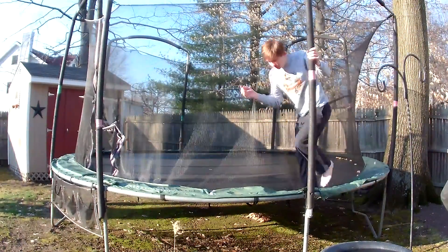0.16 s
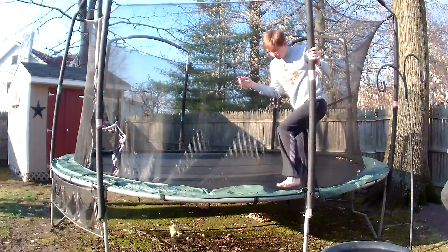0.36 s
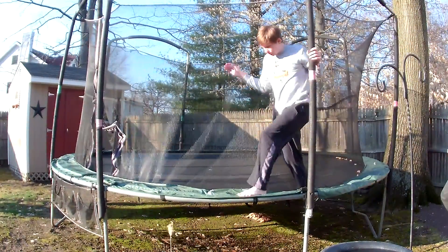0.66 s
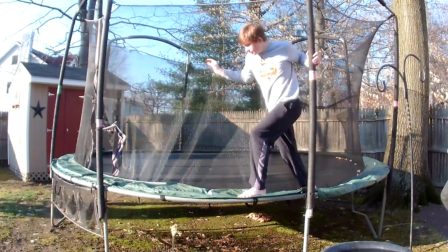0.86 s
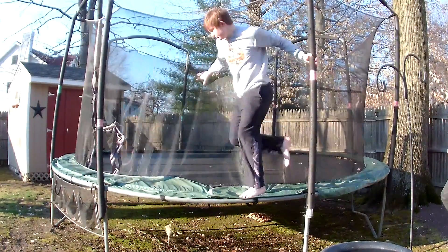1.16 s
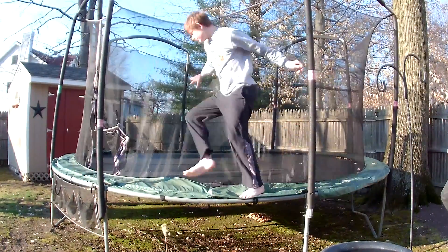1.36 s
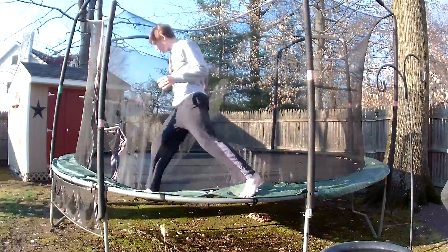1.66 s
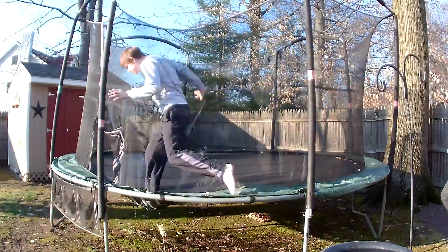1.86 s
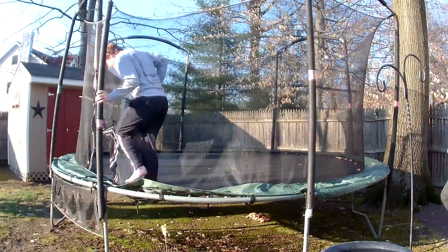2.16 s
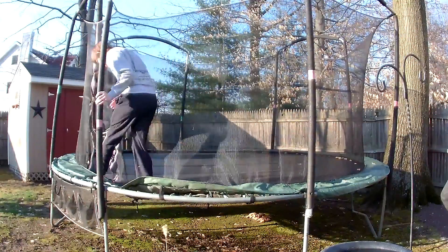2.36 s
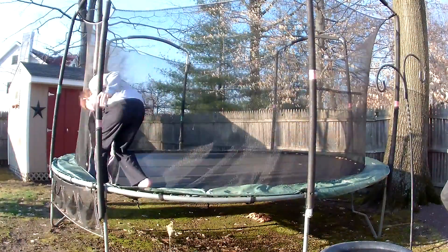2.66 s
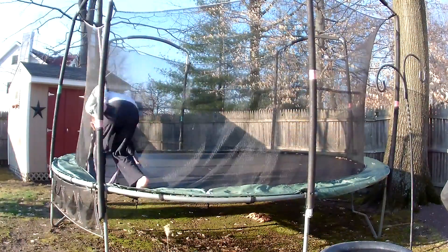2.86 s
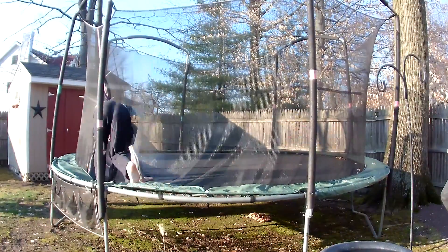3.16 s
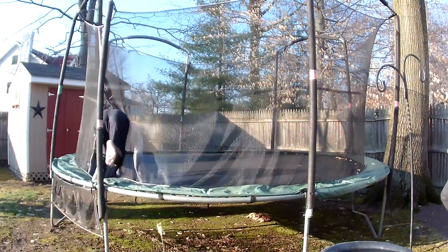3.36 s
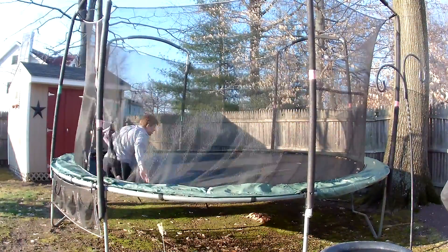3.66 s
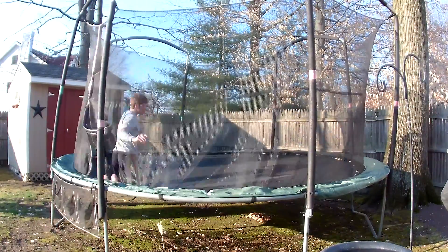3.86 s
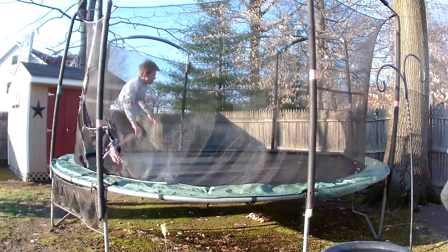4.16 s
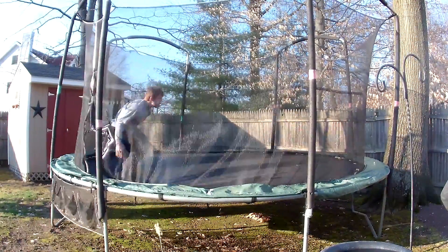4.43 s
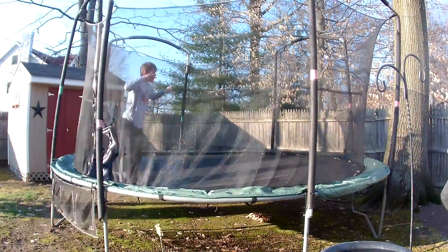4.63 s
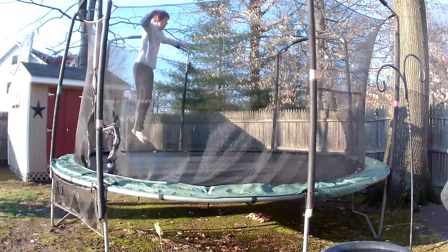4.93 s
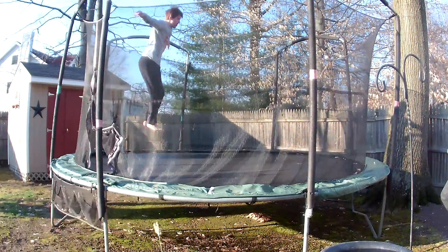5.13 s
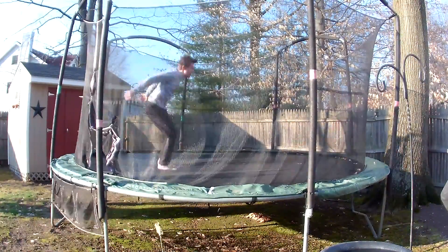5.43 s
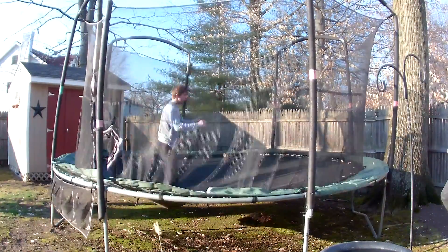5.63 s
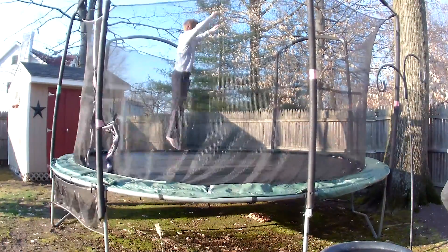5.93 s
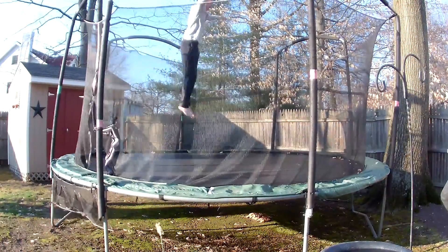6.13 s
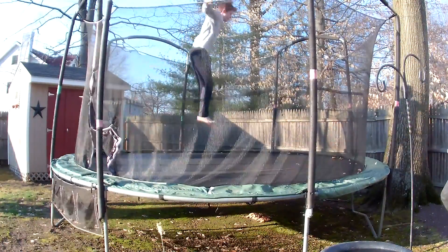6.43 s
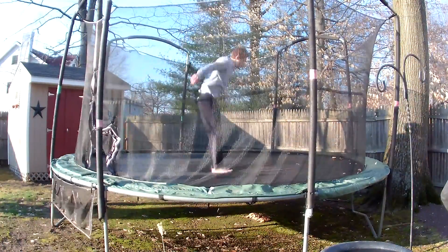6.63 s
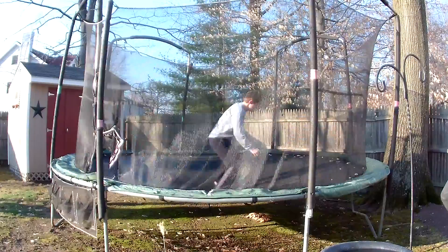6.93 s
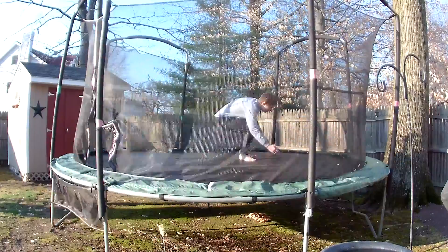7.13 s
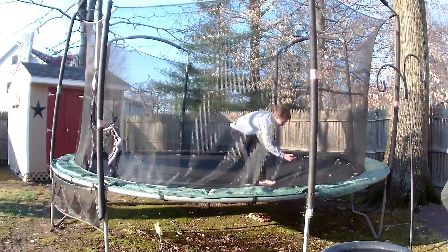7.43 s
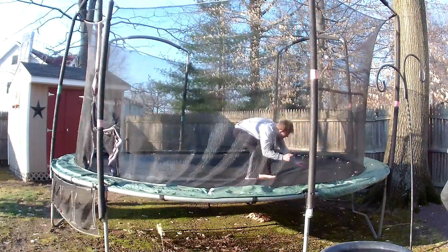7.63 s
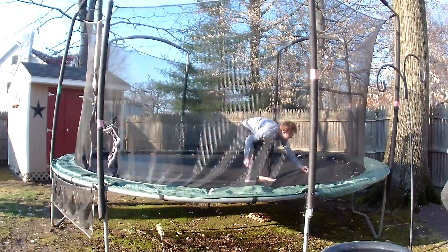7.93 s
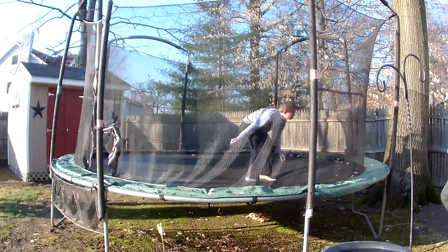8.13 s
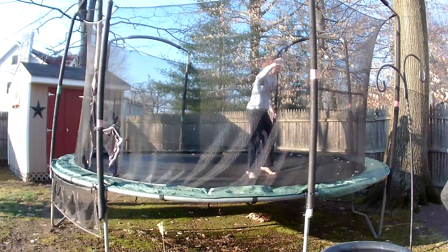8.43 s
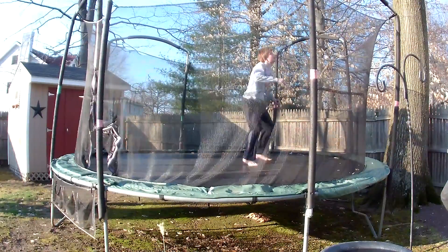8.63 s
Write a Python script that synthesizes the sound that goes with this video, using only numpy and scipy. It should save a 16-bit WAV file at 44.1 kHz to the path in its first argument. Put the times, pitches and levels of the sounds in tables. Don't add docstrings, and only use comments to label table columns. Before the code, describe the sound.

Trampoline fabric rubs and metal hooks clank as a person shuffles, hops and bounces heavily, then settles in a quiet yard with distant traffic.

```python
import sys
import numpy as np
from scipy import signal
from scipy.fft import rfft, irfft, dct, next_fast_len
from scipy.io import wavfile
from scipy.ndimage import uniform_filter1d

SR = 44100
rng = np.random.default_rng(int(sys.argv[2]) if len(sys.argv) > 2 else 0)


def digitize_waveform(pressure):
    field = np.atleast_2d(pressure).T
    bounded = np.clip(field, -1, 1)
    quanta = np.round(bounded * 32767).astype(np.int16)
    wavfile.write(sys.argv[1], SR, quanta)


def boost_factor(decibels):
    exponent = np.asarray(decibels, float) / 20
    return 10 ** exponent


N = 387638

# (frequency [Hz], level [dB per Hz])
RUB_COLOUR = [(180, -64), (300, -37.5), (492, -28.5), (873, -19.5), (1250, -11), (1430, -4), (1840, 0),
              (2380, -2), (4390, -7), (5510, -8.5), (6300, -7), (7300, -11), (9490, -41), (16100, -120)]
# (time [s], blow [dB], brightness [dB], fizz [dB])
STEP_CLANKS = [(0.195, -33, 2.5, 11), (0.6084, -44, -1, -12.5), (0.6395, -37, 0, -5.5),
               (1.1769, -30.5, -1, -8), (1.343, -33, -2.5, 2.5), (1.3551, -32, 0.5, 5.5),
               (1.5192, -34.5, 3, 7.5), (1.6532, -35.5, -3.5, -3), (1.668, -38, 3.5, 16.5),
               (1.7517, -31, 6, 14.5), (1.7907, -31, 4.5, 15), (1.902, -17.5, 0.5, -0.5),
               (1.9121, -17, -6.5, 3.5), (2.025, -26, 1, -10), (2.0401, -26.5, -11, -2),
               (2.0663, -24, -3, -23.5), (2.1125, -27, 9.5, 8), (2.173, -29.5, 5, 5), (2.646, -39.5, 1, 1),
               (2.6617, -25, 2, 2.5), (2.698, -30.5, 9, -6), (3.141, -21.5, -3, -8),
               (3.324, -35.5, 0, -3.5), (3.3689, -27.5, 6, 7), (3.379, -28, 5, 12)]
# (time [s], blow [dB], brightness [dB], fizz [dB])
JUMP_CLANKS = [(3.8518, -35.5, 3, 1.5), (3.8842, -24.5, -3, 0.5), (4.227, -35.5, 11, -2.5),
               (4.285, -31.5, 2, -9.5), (4.355, -28.5, 3, 1), (4.4246, -27, 2, 7), (4.468, -27.5, 2.5, 6),
               (4.6153, -29, 1.5, -8.5), (5.0996, -34, -7, -5), (5.085, -37, 6.5, 2.5),
               (5.108, -33, 7.5, 7.5), (5.172, -31.5, 5, 9), (6.1666, -31.5, 3.5, 11), (6.217, -40, 2, 3.5),
               (6.4073, -36.5, 2.5, 2.5), (6.6672, -31.5, -1.5, -2.5), (7.0754, -17, 0, -7),
               (7.4839, -24.5, -1, -5.5), (8.1586, -39.5, -4, -8.5), (8.543, -36.5, -5, -5.5),
               (8.706, -28.5, 4.5, 6)]


def evened(x):
    return x / np.sqrt(np.mean(x ** 2) + 1e-20)


def wander(n, width):
    return evened(uniform_filter1d(rng.standard_normal(n), width))


def smooth_wander(n, width):
    once = uniform_filter1d(rng.standard_normal(n), width)
    return evened(uniform_filter1d(once, width))


def read(points, hz):
    f, value = np.transpose(points)
    return np.interp(np.log(hz + 1), np.log(f + 1), value)


def add(mix, s, sound):
    part = mix[round(s * SR):][:len(sound)]
    part += sound[:len(part)]


def filtered(x, gain):
    size = next_fast_len(len(x))
    hz = np.fft.rfftfreq(size, 1 / SR)
    return irfft(rfft(x, size) * gain(hz), size)[:len(x)]


def coloured(x, points):
    return filtered(x, lambda hz: boost_factor(read(points, hz)))


def thirds(x):
    layers = []
    for lo, hi in ((0, 2800), (2800, 7900), (7900, SR)):
        layers.append(evened(filtered(x, lambda hz: (hz >= lo) & (hz < hi))))
    return layers


def yard():
    # (frequency [Hz], level [dB per Hz])
    yard_colour = [(9.4, -28), (16, -1.5), (122, -5.5), (164, -12), (296, -16), (643, -19.5), (1290, -11.5),
                   (2140, -12.5), (2450, -21), (3290, -22), (3570, -24), (7150, -21), (7960, -23.5),
                   (9600, -22.5), (12500, -48), (21100, -120)]
    hz, _, z = signal.stft(rng.standard_normal(N), SR, nperseg=4096)
    patches = uniform_filter1d(rng.standard_normal(z.shape), 40, 0)
    patches = evened(uniform_filter1d(patches, 3, 1))
    hz = hz[:, None]
    level_db = read(yard_colour, hz) + 5.3 * (hz < 42) + 0.94 * patches
    x = signal.istft(z * boost_factor(level_db), SR, nperseg=4096)[1][:N]
    return boost_factor(-50.5) * evened(x)


def thump(db, hz, t60, thud_db):
    t = np.arange(SR) / SR
    sway = hz * (1 + .12 * smooth_wander(SR, 1500))
    mode = boost_factor(db - 60 * t / t60) * np.sin(2 * np.pi * np.cumsum(sway) / SR)
    mode *= (1 - np.exp(-t / 0.029)) * 2
    beat = 1 + .45 * np.cos(2 * np.pi * 9 * (t - .04))
    band = signal.butter(2, [130 / SR * 2, 800 / SR * 2], "band")
    thud = evened(signal.lfilter(*band, rng.standard_normal(SR)))
    return mode * beat + boost_factor(thud_db - 60 * t / 0.39) * thud * (1 - np.exp(-t / 0.014))


def add_thumps(mix):
    # (time [s], level [dB], pitch [Hz], time to die by 60 dB [s], thud [dB])
    landings = [(1.9, -64, 110.4, 0.249, -56), (2.128, -48.5, 112.4, 0.41, -68),
                (3.369, -57, 103.6, 0.2418, -72.5), (4.718, -59.5, 110.4, 1.277, -74),
                (5.82, -42.5, 80.29, 0.5144, -61), (5.88, -58.5, 77, 0.233, -48.5),
                (7.041, -41.5, 82.3, 0.7253, -45), (7.15, -52, 80.5, 1.3, -53),
                (5.93, -54, 109.9, .4, -68.5), (7.029, -49.5, 114.9, 0.376, -69),
                (7.3, -55.5, 104.2, 0.393, -68.5)]
    for s, *row in landings:
        add(mix, s, thump(*row))


def pop(db, hz, length):
    t = np.arange(-.004 * SR, .006 * SR) / SR
    return boost_factor(db) * np.cos(2 * np.pi * hz * t) * np.exp(-(3 * t / length) ** 2)


def add_pops(mix):
    # (time [s], level [dB], pitch [Hz], length [s])
    cloth_pops = [
        (1.3691, -25.5, 2400, 0.0015),
        (4.0371, -24, 1950, 0.0053),
        (5.8636, -12.5, 1700, 0.0032),
        (5.8891, -25, 1800, 0.0026),
        (5.8951, -21.5, 1600, 0.0015),
        (7.1101, -21, 1420, .004),
        (7.2671, -27, 2300, 0.0013),
    ]
    for s, *row in cloth_pops:
        add(mix, s - .004, pop(*row))


def squeak(length, start_hz, end_hz, db, fall_db, waver):
    n = int(length * SR)
    hz = np.linspace(start_hz, end_hz, n) * (1 + waver * wander(n, 120))
    turns = np.cumsum(hz) / SR
    x = np.zeros(n)
    for k in range(1, int(max(5600 / end_hz, 1)) + 1):
        level_db = read(RUB_COLOUR, k * start_hz) - fall_db * k
        x += boost_factor(level_db) * np.sin(2 * np.pi * k * turns + k * k)
    fade = signal.windows.tukey(n, .6)
    return boost_factor(db) * evened(x) * fade * boost_factor(3 * wander(n, 150))


def add_squeaks(mix):
    # (time [s], length [s], start pitch [Hz], end pitch [Hz], level [dB])
    hook_squeaks = [(0.218, 0.0987, 1640, 1650, -51.5), (0.284, 0.06224, 1752, 1789, -50),
                    (1.91, 0.06557, 2183, 2217, -36), (2.531, 0.02405, 1650, 1689, -41.5),
                    (3.143, 0.03432, 1871, 1908, -33.5), (3.385, 0.02214, 2349, 2254, -36.5),
                    (3.579, 0.03017, 1483, 1523, -40.5), (3.957, 0.02337, 2092, 2213, -30),
                    (4.032, 0.01526, 1973, 1955, -34.5), (4.626, 0.06557, 687.5, 741.6, -29.5),
                    (4.699, 0.03427, 1132, 1184, -43), (4.835, 0.03828, 1343, 1565, -35),
                    (4.865, .04, 1926, 1960, -36), (5.677, 0.0197, 1973, 1980, -40),
                    (5.736, 0.0319, 3380, 3361, -39), (5.745, 0.0315, 4300, 4230, -38.5),
                    (5.918, 0.02299, 1434, 1412, -31.5), (7.001, 0.04695, 1897, 1904, -40.5)]
    for s, *row in hook_squeaks:
        fall_db = 1.3033 * (-30.5 - row[-1])
        add(mix, s, squeak(*row, fall_db, waver=.012))


def add_rings(mix):
    # (time [s], length [s], start pitch [Hz], end pitch [Hz], level [dB])
    singing_coils = [(.28, .06, 1903, 1884, -51), (0.238, .04, 2104, 2055, -54),
                     (0.25, 0.05856, 9144, 9095, -54.5), (1.91, 0.09408, 5885, 5970, -43),
                     (1.906, 0.0428, 9050, 9011, -39), (1.903, 0.03774, 6320, 6328, -33.5),
                     (1.97, 0.05184, 2173, 2186, -46.5), (2.744, 0.02893, 1697, 1701, -45),
                     (3.883, 0.0337, 5909, 5848, -46), (3.882, 0.02781, 9524, 9498, -46.5),
                     (3.947, 0.02954, 3900, 3843, -40), (4.008, 0.03474, 2869, 2853, -38.5),
                     (4.678, 0.03776, 2815, 2933, -37.5), (4.681, 0.03456, 1907, 1910, -39.5),
                     (4.702, 0.03965, 2180, 2119, -36.5), (4.737, 0.0652, 2150, 2184, -45.5),
                     (4.922, 0.04327, 6000, 5986, -42.5), (5.699, 0.02092, 1960, 1965, -37),
                     (5.726, 0.06916, 1927, 1872, -39.5), (5.79, 0.05806, 2111, 2197, -32.5),
                     (5.875, 0.02932, 1921, 1884, -38), (5.905, 0.03036, 1823, 1802, -39.5),
                     (5.925, 0.02418, 4280, 4261, -40.5), (5.973, 0.03231, 9333, 9430, -40),
                     (6, 0.027, 8609, 8612, -39.5), (5.998, .025, 1897, 1882, -37),
                     (6.0, .025, 2835, 2835, -40), (6.028, .028, 6537, 6521, -37),
                     (6.945, 0.04113, 4274, 4320, -42), (6.949, 0.0533, 3613, 3562, -41.5),
                     (7.034, 0.02845, 1899, 1880, -39.5), (7.102, 0.0253, 1618, 1598, -37),
                     (7.16, 0.0251, 1841, 1867, -41.5), (7.189, 0.07547, 2024, 1970, -42.5),
                     (7.222, 0.0495, 6484, 6495, -39.5), (7.246, 0.02387, 6084, 6142, -40.5)]
    for s, *row in singing_coils:
        add(mix, s, squeak(*row, fall_db=17.5, waver=.005))


def clank(db, bright_db, fizz_db, t60):
    # (pitch [Hz], level [dB], time to die by 60 dB [s])
    spring_tones = [(1650, -13.5, 0.18), (2174.8, 5, .37), (3012.1, -0.5, 0.15), (3661.2, 1, 0.34),
                    (4300, -12, 0.11), (5078.7, -4.5, 0.21), (5993.7, 0.5, 0.15), (9151.6, 3.5, 0.083)]
    t = np.arange(min(SR // 6, int(2 * t60 * SR))) / SR
    colour = RUB_COLOUR[:-2] + [(10000, -30.5)]
    body, bright, fizz = thirds(coloured(rng.standard_normal(len(t)), colour))
    rattle = body + boost_factor(bright_db) * bright + boost_factor(fizz_db) * fizz * boost_factor(-30 * t / t60)
    rattle *= boost_factor(-60 * t / t60) + .8 * boost_factor(-60 * t / 0.025)

    tune = rng.uniform(1.0, 1.04, len(spring_tones))
    size = rng.uniform(0.12, 1, len(spring_tones))
    ring = np.zeros(len(t))
    for (hz, tone_db, tone_t60), k, a in zip(spring_tones, tune, size):
        dull_db = min(bright_db, 0) * (hz > 3300)
        decay = boost_factor(tone_db + dull_db - 60 * t / min(tone_t60, 2 * t60))
        ring += a * decay * np.sin(2 * np.pi * hz * k * t)
    rise_s = .0016 * boost_factor(-0.2436 * (db + 30))
    return boost_factor(db - 11) * (rattle + 0.37 * ring) * np.minimum(t / rise_s, 1)


def add_ticks(mix):
    # (time [s], peak [dB], brightness [dB], fizz [dB])
    dry_ticks = [(0.3729, -39.5, 0.5, -3.5), (0.609, -35.5, 2.5, -2), (0.6396, -28, 0.5, 1.5),
                 (1.1841, -24, 2, 0.5), (1.1947, -25.5, 2, 2), (1.2078, -29, -0.5, -2.5),
                 (1.355, -20, 1, 2), (1.4837, -26, 4.5, 2), (1.4968, -26.5, 4, 3), (2.1953, -26.5, 5.5, 1),
                 (2.5421, -29, -4, 4.5), (2.698, -22, 0.5, 3.5), (2.7215, -18.5, 3.5, 3.5),
                 (2.7332, -23, 2, 2), (2.7414, -21.5, 2, 4.5), (2.7526, -21, 3.5, -0.5),
                 (3.0204, -22.5, 3, 2), (3.3985, -19.5, 2.5, 1.5), (4.153, -26, -0.5, 3.5),
                 (4.1695, -24, 2, 2.5), (4.1808, -24.5, 3, 5), (4.2032, -21.5, 2, 4),
                 (4.2567, -25, 2.5, 0.5), (4.9208, -21.5, 2, 7.5), (4.9289, -18, 3, 3.5),
                 (4.9438, -21.5, 0, 3.5), (5.1859, -21.5, 4, 5), (5.2004, -22.5, 1.5, 3.5),
                 (5.701, -23.5, 1, -5.5), (5.7878, -15, 3, 2), (5.8064, -13, 1.5, 5),
                 (5.9039, -19, 2.5, 5.5), (6.1335, -30, 3, 0), (6.1661, -22.5, 2, 4),
                 (6.1815, -23, 2.5, 1.5), (6.219, -24.5, -1.5, 3.5), (6.2268, -24, 2.5, 4.5),
                 (6.2435, -20.5, 4, 4.5), (6.9461, -19, 3.5, -2.5), (6.9544, -20.5, 0, -5),
                 (6.978, -18.5, 1, 3), (7.0031, -18.5, 2, 0), (7.1189, -15, 2, 3.5), (7.2044, -16, 2, 0.5),
                 (7.249, -17.5, 3, 6), (7.2656, -18.5, 0, 0.5), (7.2883, -21.5, 3, -0.5),
                 (7.5815, -28, 1, -1.5)]
    for s, peak_db, *row in dry_ticks:
        blow_db = -26.5 + .6 * (peak_db + 24.5)
        add(mix, s - .001, clank(blow_db, *row, t60=.03))


def add_clanks(mix):
    for s, *row in STEP_CLANKS + JUMP_CLANKS:
        add(mix, s - .001, clank(*row, t60=.136))


def hush_before_knocks(t, hold=0.031):
    s = np.array(STEP_CLANKS + JUMP_CLANKS)[:, 0]
    coming = np.minimum(np.searchsorted(s, t), len(s) - 1)
    return -3 * np.clip(1.5 - (s[coming] - t) / hold, 0, 1) * (t < s[-1])


def strokes(t):
    # (peak time [s], effort [dB], time to rise 20 dB [s], time to fall 20 dB [s], brightness [dB])
    walking = [(0.0, -42.5, .05, -0.0926, -4.5), (.24, -48.5, 0.0686, 0.2221, 4.5),
               (.31, -45, 0.01, 0.3334, -10), (1.162, -44.5, .011, .21, 3.5),
               (1.197, -40.5, .035, .12, 2.5), (1.365, -47, .03, .13, 3),
               (1.494, -43.5, 0.2102, 0.3784, 6.5), (1.67, -44, 0.1254, 0.4407, 0.5),
               (1.71, -48.5, 0.3889, 1.0667, 1.5), (1.85, -45, 0.6296, -0.0174, -2),
               (1.911, -32.5, 0.0563, 0.1142, -0.5), (2.03, -33, -0.1313, -0.1532, 0),
               (2.143, -38, 0.054, 0.0249, -3), (2.2, -42, 0.161, 0.3001, 1),
               (2.53, -42, 0.1201, 0.3145, 0), (2.755, -32.5, 0.1277, 0.1167, -2),
               (2.96, -50.5, 0.8708, -1.5, -4), (3.019, -39, 0.0995, 0.0499, 3.5),
               (3.156, -34, -0.0872, 0.2131, -2.5), (3.343, -37, 0.0258, 0.1514, -2),
               (3.385, -34.5, 0.0385, 0.1095, 5), (3.451, -34, 0.032, 0.2282, -3),
               (3.601, -37, 0.0628, 0.0236, -1.5), (3.67, -42.5, 0.3838, 0.1592, 4)]
    hopping = [(3.972, -32, 0.11996, 0.25686, 0.5), (4.039, -33, 0.2195, 0.058, -1.5),
               (4.18, -41, 0.223, 0.33, -1.5), (4.279, -40.5, 0.2465, 0.11, -0.5),
               (4.209, -43.5, 0.065, 0.029, 7.5), (4.48, -43, 0.09855, 0.081, 1.5),
               (4.628, -33.5, 0.01658, .16, 0), (4.732, -33, 0.12193, 0.13154, -1.5),
               (4.849, -36, 0.046, 0.11, -5.5), (4.94, -35, 0.07658, 0.12357, 3.5),
               (5.07, -40.5, 0.0934, .2, -2.5), (5.209, -37, 0.033, 0.15347, 3),
               (5.239, -40, 0.2194, 0.054, -4)]
    jumping = [(5.652, -49, 0.017, 0.022, 5), (5.729, -34.5, 0.044, 0.39, 0),
               (5.801, -27, 0.075, 0.26, 0.5), (5.88, -34.5, 0.18, 0.11, -14.5),
               (6.002, -31, 0.14245, 0.16715, 3), (6.14, -43, 0.027, 0.17, 3.5),
               (6.191, -41.5, 0.077, 0.072, 1.5), (6.222, -40, 0.019, 0.068, 5.5),
               (6.289, -40.5, 0.092, 0.096, -3.5), (6.1, -45, .1, 0.089, 0.5),
               (6.425, -46.5, 0.058, 0.1, -2.5), (6.549, -49, 0.02, 0.032, 1.5),
               (6.84, -54, 0.026, 0.017, 0), (6.95, -35, 0.07501, 0.44, 1.5),
               (6.996, -33.5, 0.042, 0.41, 2.5), (7.116, -29, 0.1727, .08, -2),
               (7.21, -35, 0.11, 0.3564, 4), (7.275, -36.5, .2, 0.097, 3.5), (6.255, -37.5, .02, 0.1641, 3),
               (5.695, -43.5, .015, 0.19, 1), (7.42, -39, 0.11, 0.35, -0.5),
               (7.499, -36, 0.034, 0.062, 3.5), (7.57, -44.5, 0.13, .25, -1),
               (7.68, -52.5, 0.074, 0.07437, 6.5), (8.741, -43, 0.064, 0.055, -2.5)]
    rest_db = -59.5 + np.array([[0], [0.5], [-2.5]])
    power = np.ones((3, len(t))) * boost_factor(rest_db) ** 2
    for s, effort_db, rise, fall, bright_db in walking + hopping + jumping:
        before = 20 * np.maximum(s - t, 0) / abs(rise)
        after = 20 * np.maximum(t - s, 0) / abs(fall)
        fizz_db = -5.5 + 0.98 * bright_db
        lifts = ((0, 1), (bright_db, 1.2183), (fizz_db, 1.7032))
        power = power + [boost_factor(effort_db + lift_db - before - fade * after) ** 2 for lift_db, fade in lifts]
    return np.sqrt(power)


def scrape(per_s=350, spread_db=1.5, cycles=9, smooth=.4):
    x = np.zeros(N)
    for hz in np.geomspace(500, 10000, num=30):
        t = np.arange(int(3 * cycles / hz * SR)) / SR
        grain = np.sin(2 * np.pi * hz * t) * t * np.exp(-4 * t * hz / cycles)
        count = int(per_s * np.sqrt(hz / 2000) * N / SR)
        at, luck, side = rng.random((12000, 3))[:count].T
        force = np.sign(side - .5) * boost_factor(spread_db * np.minimum(-np.log(luck), 4))
        slips = np.bincount((at * N).astype(int), force, N)
        x += np.sqrt(hz) * evened(signal.oaconvolve(slips, grain)[:N])
    return evened(x) + smooth * rng.standard_normal(N)


def rubbing():
    t, coarse = np.arange(N) / SR, np.arange(0, N + 64, 64) / SR
    layers = thirds(coloured(scrape(), RUB_COLOUR[:-2] + [(10000, -20.5)]))
    flicker_db = .6 * smooth_wander(N, 300)
    x = np.zeros(N)
    for layer, gain in zip(layers, strokes(coarse)):
        x += layer * np.interp(t, coarse, gain)
    return x * boost_factor(flicker_db + hush_before_knocks(t))


def scene():
    mix = yard() + rubbing()
    add_clanks(mix)
    add_squeaks(mix)
    add_rings(mix)
    add_ticks(mix)
    add_pops(mix)
    add_thumps(mix)
    return np.array([mix, mix])


def starved(x, size, width, group, step_db, luck_db, follow):
    window = np.sin(np.pi * (np.arange(2 * size) + .5) / (2 * size))
    count = N // size + 3
    blocks = np.pad(x, (size, count * size - N - size)).reshape(count, size)
    a, b, c, d = np.split(np.hstack([blocks[:-1], blocks[1:]]) * window, 4, axis=1)
    lines = dct(np.hstack([-c[:, ::-1] - d, a - b[:, ::-1]]), type=4, norm="ortho")

    level = uniform_filter1d(lines ** 2, size=size // 16, axis=1)
    level = uniform_filter1d(level, size=group, axis=0)
    level_db = 10 * np.log10(abs(level) + 1e-14)
    luck = rng.standard_normal((count - 1, size // width + 1))
    luck = np.repeat(luck, width, axis=1)[:, :size]
    hz = np.arange(size) / size * SR / 2
    care_db = np.interp(hz, [1200, 2800, 5600, 6400, 8400, 8600], [-14, 0, 0, -3, -3, -12])
    step = boost_factor(follow * (level_db + 40) - 40 + step_db + care_db + luck_db * luck)
    rounded = np.sign(lines) * np.floor(abs(lines) / step + .4) * step

    u, v = np.split(dct(rounded, type=4, norm="ortho"), 2, axis=1)
    back = np.hstack([v, -v[:, ::-1], -u[:, ::-1], -u]) * window
    return (back[1:, :size] + back[:-1, size:]).ravel()[:N]


def band_limit(x):
    return signal.sosfilt(signal.butter(12, 10930, fs=SR, output="sos"), x)


def record(dry):
    # (frequency [Hz], gain [dB])
    gain_curve = [(0, -2), (7450, 0.5), (7540, -3.5), (7950, -31.5), (8300, -2.5), (8550, 3),
                  (9620, 7.5), (9800, -10.5), (22050, -40)]
    sharp_blows = [.195, 1.752, 1.791, 1.902, 2.112, 2.16, 2.662, 2.698, 3.37, 4.355, 4.425, 4.468, 5.1,
                   5.14, 5.172, 6.167, 7.076, 8.706]
    x = filtered(dry[0], lambda hz: boost_factor(np.interp(hz, *np.transpose(gain_curve))))
    blows = np.bincount((np.array(sharp_blows) * SR).astype(int), minlength=N) * 1.
    short = uniform_filter1d(blows, size=2000) > 1e-6
    short = uniform_filter1d(short * 1., size=400)
    quick = starved(x, size=176, width=4, group=8, step_db=4.5, luck_db=4, follow=.9)
    slow = starved(x, size=1408, width=10, group=1, step_db=5.4, luck_db=3.8, follow=.93)

    near = uniform_filter1d(x ** 2, size=200) + 1e-12
    far = uniform_filter1d(x ** 2, size=2800) + 1e-12
    slow = x + (slow - x) * np.clip(2 * np.sqrt(abs(near / far)), 0, 1)
    both = short * quick + (1 - short) * slow
    edge_hz, edge_db = [9551.1, 9769.5, 10526, 12050], [0, -30.5, -32.0, -47.5]
    mono = filtered(both, lambda hz: boost_factor(np.interp(hz, edge_hz, edge_db)))
    return band_limit(np.array([mono, mono]))


dry = scene()
out = record(dry)
digitize_waveform(out)
```